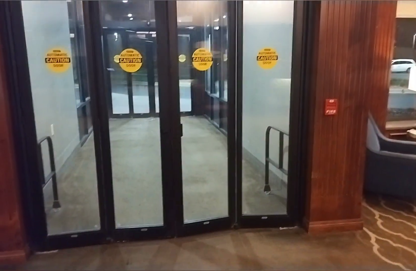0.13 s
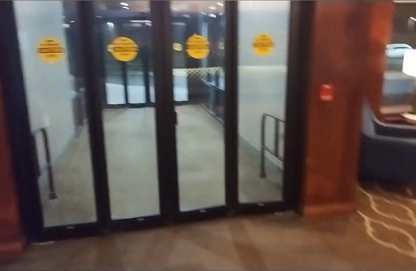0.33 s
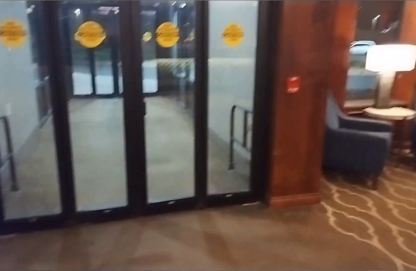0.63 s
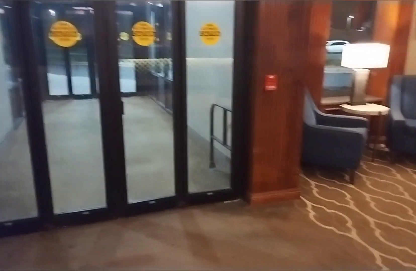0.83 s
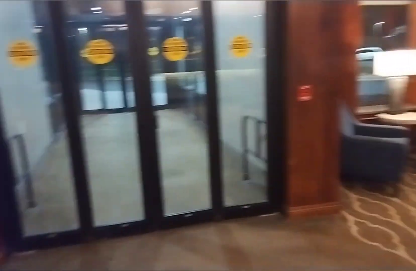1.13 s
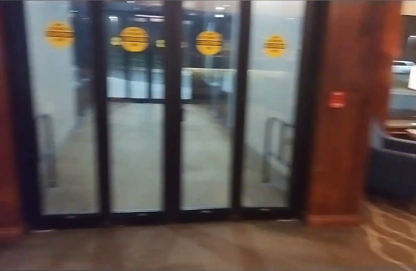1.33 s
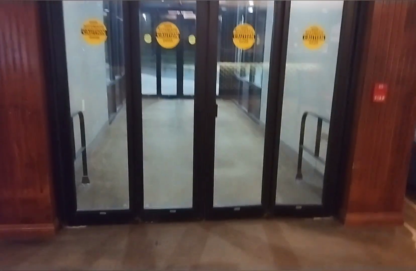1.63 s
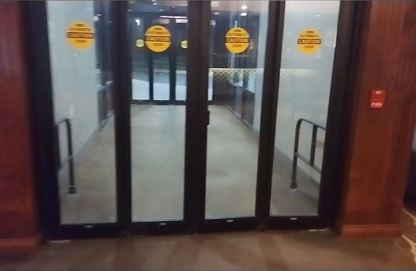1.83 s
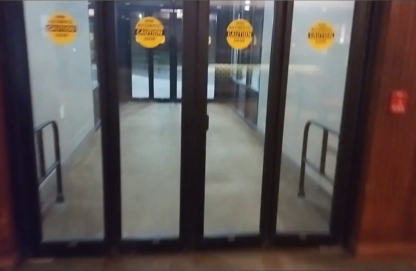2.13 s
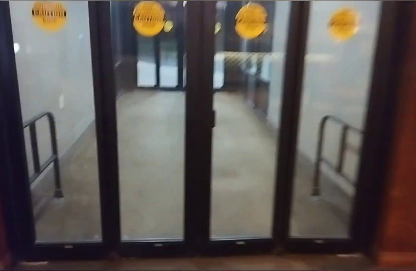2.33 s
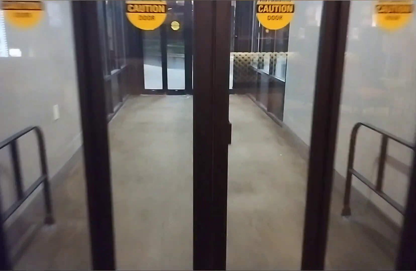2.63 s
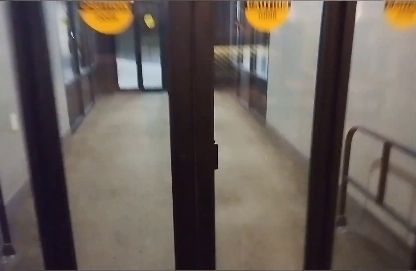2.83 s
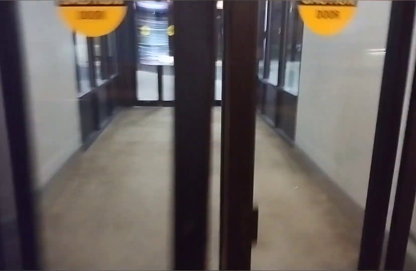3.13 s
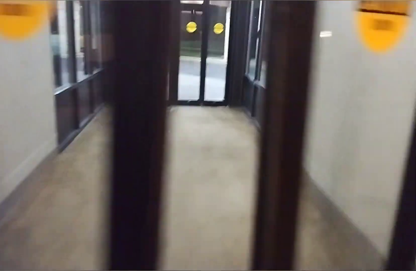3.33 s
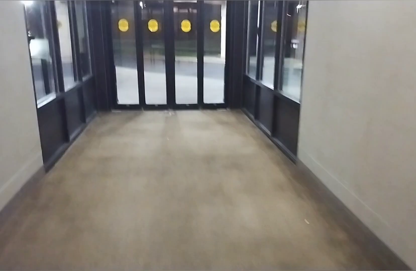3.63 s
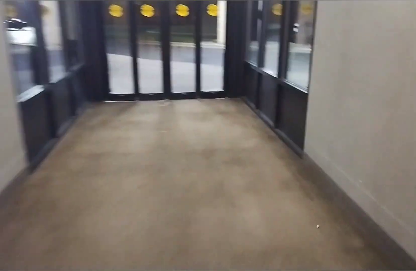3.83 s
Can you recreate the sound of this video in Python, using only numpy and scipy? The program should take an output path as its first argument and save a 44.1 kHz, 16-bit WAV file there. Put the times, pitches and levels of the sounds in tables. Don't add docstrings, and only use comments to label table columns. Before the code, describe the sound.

Glass automatic doors rattle and hiss as they settle shut, then a quiet stretch of ventilation hum with faint soft steps, then they roll open loudly with thuds and motor whine, close to a handheld microphone.

```python
import sys
import numpy as np
from scipy import signal
from scipy.fft import rfft, irfft, next_fast_len
from scipy.io import wavfile
from scipy.ndimage import uniform_filter1d, map_coordinates

SR = 44100
rng = np.random.default_rng(int(sys.argv[2]) if len(sys.argv) > 2 else 0)


def how_loud(loudness_db):
    steps = np.asarray(loudness_db, float) / 20
    return 10 ** steps


def store_wav(level_fs):
    pcm = np.round(np.clip(np.atleast_2d(level_fs), -1, 1) * 32767)
    wavfile.write(sys.argv[1], SR, pcm.T.astype(np.int16))


N = 176400

# pitch in Hz, left over right in dB.
SIDEWAYS = [(60, 5), (140, 4), (280, -0.5), (600, 0.5), (1300, -5), (2500, -6.5), (5000, -0.5), (9000, -2),
            (13000, 3)]


def unit(x):
    return x / np.sqrt(np.mean(x ** 2) + 1e-20)


def along(points, hz):
    f, v = np.transpose(points)
    return np.interp(np.log(hz + 1), np.log(f + 1), v)


def wobble(rate):
    knots = rng.standard_normal(int(N * rate / SR) + 4)
    return map_coordinates(knots, [np.arange(N) * rate / SR])


def filtered(x, response):
    m = next_fast_len(x.shape[-1] + 8192)
    spectrum = rfft(x, m) * response(np.fft.rfftfreq(m, 1 / SR))
    return irfft(spectrum, m)[..., :x.shape[-1]]


def spread(pair, gain):
    # pitch in Hz, likeness of left and right (1 is the same).
    alike = [(60, 0.45), (140, 0.75), (300, 0.9), (700, 0.6), (1500, 0.1), (8000, 0.1)]

    def middle_and_side(hz):
        turn = np.arccos(np.clip(along(alike, hz), -1, 1)) / 2
        return gain(hz) * [np.cos(turn), np.sin(turn)]

    def lean(hz):
        return how_loud(along(SIDEWAYS, hz) * np.array([[.5], [-.5]]))

    mid, side = filtered(pair, middle_and_side)
    return unit(filtered(np.array([mid + side, mid - side]), lean))


def add(out, s, sound, pan_db=0):
    part = out[:, round(s * SR):][:, :sound.shape[-1]]
    part += sound[..., :part.shape[1]] * how_loud([[pan_db / 2], [-pan_db / 2]])


def panel_modes(x):
    z = signal.stft(x, nperseg=2048)[2]
    field = rng.standard_normal(z.shape[1:])
    field = uniform_filter1d(field, size=2, axis=0)
    field = uniform_filter1d(field, size=5, axis=1)
    swell_db = 3.5 * unit(field)
    return signal.istft(z * how_loud(swell_db), nperseg=2048)[1][:, :N]


def jolting(share):
    jolts_per_s, jolt_db, jolt_t60_s = 220, -0.5, .022
    strength = how_loud(jolt_db * np.minimum(rng.exponential(size=N), 2))
    jolts = (rng.random(N) < jolts_per_s / SR) * strength
    flare = signal.fftconvolve(jolts, how_loud(-60 * np.arange(2000) / SR / jolt_t60_s))[:N]
    hiss = panel_modes(rng.standard_normal((2, N)))
    return hiss * (1 - share + share * unit(flare))


def rolling():
    # time in seconds, rolling effort in dB, weight on the track in dB.
    travel = [(.08, -68.5, 1.5), (0.129, -58, -2.5), (.24, -53.5, -9), (0.437, -63, -6), (0.476, -41, -2),
              (0.569, -43, -8), (.63, -44.5, -2), (0.878, -50.5, 4), (.92, -59, -2.5), (1.28, -64, -5),
              (1.33, -64.5, -1), (1.48, -63.5, -6.5), (1.7, -74, -18), (2.4, -75, -2), (2.904, -66.5, -5),
              (3.004, -44, -6), (3.35, -37.5, -5.5), (4, -38.5, -2.5)]
    # pitch in Hz, level in dB per Hz.
    shutting = [(260, -78), (450, -7.5), (850, 1), (1340, -7), (2010, -1), (3490, -8.5), (4700, -23.5),
                (7110, -17), (14500, -54.5)]
    settling = [(260, -37), (450, -26.5), (828, -3.5), (2290, 3), (13300, -43), (14500, -37)]
    opening = [(260, -101), (450, -20.5), (716, -6), (1140, -11), (1260, -18.5), (2260, -11.5), (3860, -43),
               (7650, -50), (14500, -68.5)]
    rumbling = [(15, -50), (25, -16.5), (102, -3.5), (193, -5), (333, -8), (520, -18), (680, -49),
                (1140, -120)]
    # pitch in Hz, width in Hz, lift in dB.
    resonances = [(2060, 60, 1.5), (2380, 110, 4), (3404, 23, 4.5), (6100, 75, 5)]
    jolt_shares = [.38, .3, .38]

    def frame(f):
        answer = 1
        for centre, width, db in resonances:
            answer = answer + (how_loud(db) - 1) * 1j * f * width / (centre ** 2 - f ** 2 + 1j * f * width)
        return answer

    t = np.arange(N) / SR
    s, effort_db, weight_db = np.transpose(travel)
    effort = how_loud(np.interp(t, s, effort_db))
    weight = how_loud(4.5 + np.interp(t, s, weight_db))
    stages = []
    for colour, share in zip((shutting, settling, opening), jolt_shares):
        stages.append(spread(jolting(share), lambda hz: how_loud(along(colour, hz)) * frame(hz)))
    shut, settle, opened = stages
    hiss = np.select([t < 1.13, t < 2.3], [shut, settle], opened) * how_loud(0.89 * wobble(12))
    rumble = spread(rng.standard_normal((2, N)), lambda hz: how_loud(along(rumbling, hz)))
    rumble = rumble * how_loud(1.6 * wobble(30))
    return effort * (hiss + weight * rumble)


def hum():
    # pitch in Hz, level in dB per Hz.
    colour = [(15, -55), (25, -19), (97, -3.5), (199, -7), (260, -5), (455, -14.5), (1190, -27),
              (2440, -30), (14500, -43)]
    air = spread(rng.standard_normal((2, N)), lambda hz: how_loud(along(colour, hz)))
    return how_loud(-65 + 0.36 * wobble(8.7)) * air


def pane_crack(t):
    # pitch in Hz, level in dB.
    colour = [(2200, -11), (3500, 12), (5000, -3.5), (6500, 6), (8500, -0.5), (10500, -14.5), (14500, -27)]
    uneven_db = 2.24 * rng.standard_normal(20)

    def brightness(f):
        return how_loud(along(colour, f) + np.interp(f, 900 * np.arange(20), uneven_db))

    noise = unit(filtered(rng.standard_normal((2, len(t))), brightness))
    rise = 1 - np.exp(-t / .0012)
    fade = np.exp(-(t / 0.01) ** 2) + how_loud(-14 - 60 * t / .2)
    return noise * fade * rise


def frame_ring(t, hz):
    modes = hz * np.exp(.17 * np.r_[0, rng.uniform(-1, 1, 9), -4])[:, None]
    mode_db = rng.normal(0, 3, modes.shape) + 7 * (modes == hz)
    tones = (how_loud(mode_db) * np.sin(2 * np.pi * modes * t)).sum(0)
    ring = tones * how_loud(-60 * t / .025) * (1 - np.exp(-t / .0008)) ** 2
    taps = rng.random(900) < .03
    chatter = rng.standard_normal((2, 900)) * np.exp(-(t[:900] / 0.0073) ** 2) * taps
    ring = signal.fftconvolve(chatter, ring[None], axes=1)[:, :len(t)]
    return ring / ring[:, :700].std(1)[:, None]


def knocks(out):
    # start in seconds, crack level in dB, ring over
    # crack in dB, left over right in dB, ring pitch in Hz.
    pane_knocks = [(0.0867, -55.5, -12, 1, 3000), (0.1054, -54, -2, -4.5, 2520),
                   (0.182, -44.5, 2.5, 7, 3015), (0.2264, -44, 3.5, -3, 3140),
                   (0.3731, -41.5, -1.5, -12.5, 1420), (0.4534, -41.5, 8.5, 3, 2400),
                   (0.4713, -43.5, 15, 8, 3526), (0.5018, -34.5, -3, 14, 2140),
                   (0.5337, -33.5, 2, 5, 2505), (0.6011, -57, 15, -4, 2090), (0.6509, -44, 4.5, 7, 3420),
                   (0.6949, -52, 13, 0, 2940), (0.7487, -47.5, 14.5, -11, 1883),
                   (0.825, -57.5, 15, -8, 2300), (0.9034, -55, -2, -7, 3440),
                   (0.9443, -49, 1.5, -7.5, 3605), (1.0301, -47, 2.5, 4, 3470),
                   (1.1104, -52.5, 7.5, -8, 1838), (1.128, -71, 21, -11, 2200),
                   (1.1942, -56.5, 0, -10, 3480), (1.3014, -72, 26.5, -21, 1777),
                   (1.318, -72, 22, -8, 2180), (1.395, -74.5, 22.5, -11, 1740),
                   (2.5875, -65, 7.5, 1, 2480), (2.62, -61.5, -1, -3, 2430),
                     (2.914, -55.5, 4.5, -12, 2410), (2.9574, -46, -24, -2, 2150),
                     (2.9743, -53, 16, -8, 2500), (2.989, -31, -2.5, 2, 3086), (3.042, -33.5, 2.5, 7, 2464),
                     (3.1001, -42.5, 15, 0.5, 2648), (3.175, -37, -9, 6, 1900), (3.2398, -45, 7, 0, 2280),
                     (3.2878, -46, 24, -5, 2466), (3.3345, -33, 16, -24, 2262),
                     (3.345, -60.5, 37.5, -19, 2240), (3.389, -51.5, 22, -10, 2540),
                     (3.4324, -47, 20.5, -17, 2394), (3.5395, -49, 23, 2, 2620),
                     (3.6438, -43.5, 18, -8.5, 2540), (3.767, -47, -30, -2.5, 2060),
                     (3.7975, -48, 30, -1, 2452), (3.822, -37.5, 11, -2, 1780),
                     (3.8776, -27.5, 7.5, -2, 2045), (3.921, -40.5, 15.5, -4, 2240),
                     (3.9504, -39.5, 19, -10, 2440), (3.9778, -29.5, 8, -12, 2100)]
    t = np.arange(SR // 8) / SR
    for s, crack_db, ring_db, pan_db, hz in pane_knocks:
        knock = pane_crack(t) + how_loud(ring_db) * frame_ring(t, hz)
        add(out, s, how_loud(crack_db - 11.0) * knock, np.clip(pan_db, -6, 6))


def thuds(out):
    # start in seconds, peak in dB, pitch in Hz, time to fade by 60 dB in seconds.
    bumps = [(.105, -45, 263, 0.052), (0.475, -42, 202, 0.055), (0.631, -26.5, 198.2, 0.09),
             (1.031, -45.5, 940, 0.023), (2.285, -58.5, 882, 0.074), (2.705, -57, 625, 0.16),
             (3.098, -23, 199, 0.032), (3.143, -15.5, 453, 0.016), (3.331, -22.5, 152, 0.072),
             (3.57, -20, 416, 0.032), (3.655, -21, 125.4, 0.15), (3.107, -26.5, 1504, 0.019),
             (3.335, -23, 986, 0.045), (3.575, -27.5, 1092, 0.045), (3.95, -14.5, 1002, 0.016)]
    t = np.arange(SR // 4) / SR
    for s, db, hz, t60 in bumps:
        ring = np.sin(2 * np.pi * hz * t) + 0.48 * np.sin(2 * np.pi * 1.6 * hz * t)
        rise = 1 - np.exp(-t / 0.0022)
        add(out, s, how_loud(db - 60 * t / t60) * rise * ring, along(SIDEWAYS, hz))


def snaps(out):
    # start in seconds, peak in dB, left over right in dB.
    contacts = [(0.1077, -54, 1), (0.182, -44, 1), (0.4708, -31, -1.5), (0.5038, -47, -0.5),
                (0.6525, -46, 7), (0.824, -47, 0), (0.9452, -43, 7.5), (1.0308, -48, 9), (1.108, -49, -13),
                (1.3944, -65, -3.0), (2.957, -44.5, 1), (2.9888, -28, 1.0), (2.997, -35, 2.5),
                (3.0402, -29.5, 9), (3.102, -38, 5), (3.1746, -37, 7), (3.3369, -42, 1), (3.7653, -50, 0),
                (3.8791, -25.5, 7), (3.8874, -31, 10), (3.9759, -26, 3)]
    # pitch in Hz, level in dB.
    colour = [(600, -37), (2000, -7), (3500, 10.5), (5000, -1), (8000, -14), (14500, -17)]
    t = np.arange(1000) / SR
    for s, db, pan_db in contacts:
        snap = unit(filtered(rng.standard_normal(1000), lambda f: how_loud(along(colour, f))))
        add(out, s, how_loud(db - 6.5 - 60 * t / 0.011) * snap, np.clip(pan_db, -8, 8))


def steps(out):
    # start in seconds, peak in dB, push length in seconds, left over right in dB.
    footfalls = [
        (0.375, -39.5, 0.0024, -23.5),
        (1.108, -48, 0.0055, -30),
        (1.122, -43.5, 0.0029, -13),
        (1.302, -43.5, 0.0028, -20),
        (2.201, -49, 0.0036, -15),
        (2.331, -53, 0.004, -27.5),
        (2.497, -50.5, 0.0026, -8),
    ]
    t = np.arange(SR // 4) / SR
    for s, db, length, pan_db in footfalls:
        u = t / length
        push = np.sin(np.pi * u ** 0.61) * np.exp(-u * 1.4) * 2.27
        add(out, s, how_loud(db) * push, np.clip(pan_db, -10, 10))


def room(x):
    # pitch in Hz, time to fade by 60 dB in seconds.
    fade_times = [(200, 0.12), (2000, 0.7), (10000, 0.077)]
    hz, t, z = signal.stft(rng.standard_normal((2, SR // 2)), SR, nperseg=256)
    fade = how_loud(-60 * t / along(fade_times, hz)[:, None])
    tail = signal.istft(z * fade, SR, nperseg=256)[1]
    late = np.pad(x.mean(0), (300, 0))[None]
    answer = signal.fftconvolve(late, tail / np.linalg.norm(tail[0]), axes=1)[:, :N]
    return how_loud(-5.5 + np.array([[-1], [1]])) * answer


def motor():
    # time in seconds, gear pitch in Hz.
    speed = [
        (3.1, 730),
        (3.27, 791.6),
        (3.36, 768),
        (3.45, 735),
        (3.55, 705.7),
        (3.68, 720.7),
        (3.8, 791),
        (4, 867),
    ]
    # multiple of the gear pitch, level in dB, loudest time in seconds, how long it lasts in seconds.
    gears = [
        (.42, -46, 3.95, .07),
        (.79, -49.5, 3.55, .15),
        (1, -42.5, 3.6, .22),
        (1.14, -42, 3.37, .11),
        (1.55, -47, 3.36, .18),
        (.88, -69, 1.2, .12),
    ]
    t = np.arange(N) / SR
    pitch = np.interp(t, *np.transpose(speed)) * (1 + 0.008 * wobble(35))
    turn = 2 * np.pi * np.cumsum(pitch) / SR
    whine = np.zeros(N)
    for multiple, db, s, lasts in gears:
        swell = np.exp(-((t - s) / lasts) ** 2)
        whine += how_loud(db + 3 * wobble(25)) * swell * np.sin(multiple * turn)
    return whine


def scene():
    hits = np.zeros((2, N))
    knocks(hits)
    thuds(hits)
    snaps(hits)
    steps(hits)
    return rolling() + hum() + hits + room(hits) + motor()


def top_cut(x):
    return signal.sosfilt(signal.butter(12, 14670, fs=SR, output="sos"), x)


def record(dry):
    low_hz, top_hz, lag_s = 45, 14500, 0.00018

    def ports(hz):
        lag = np.exp(2j * np.pi * hz * lag_s * np.array([[.5], [-.5]]))
        low_cut = (1j * hz / (low_hz + 1j * hz)) ** 2
        return lag * (hz < top_hz) * low_cut

    return top_cut(filtered(dry, ports))


dry = scene()
out = record(dry)
store_wav(out)
```